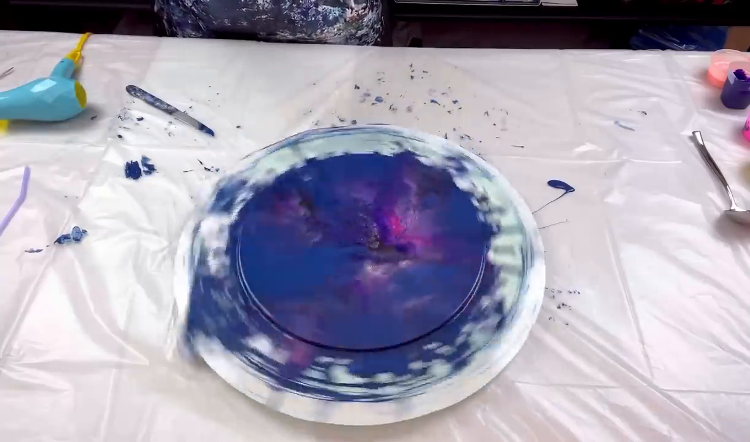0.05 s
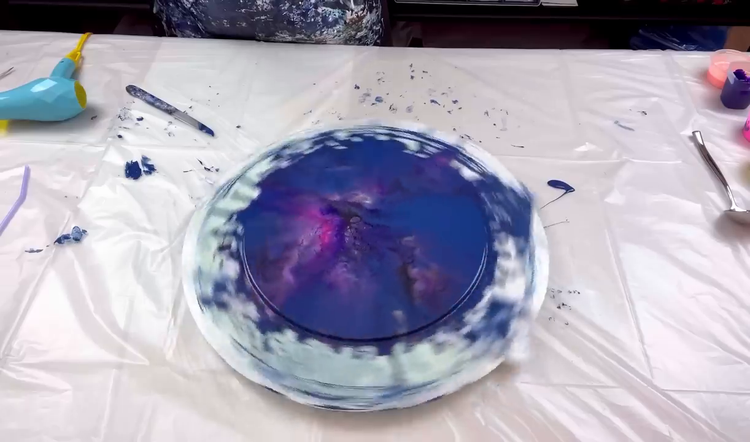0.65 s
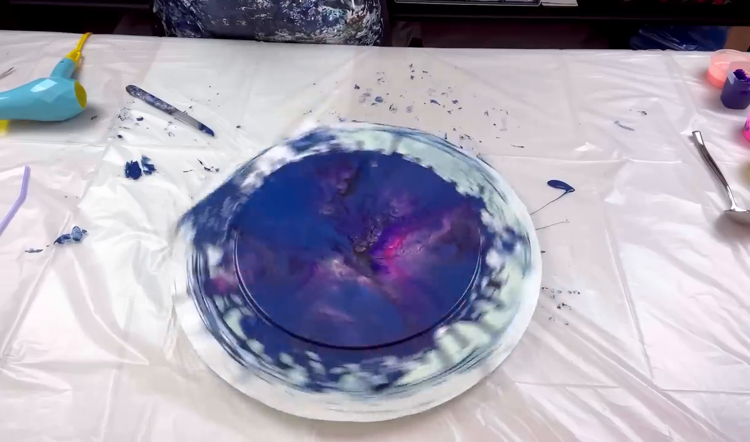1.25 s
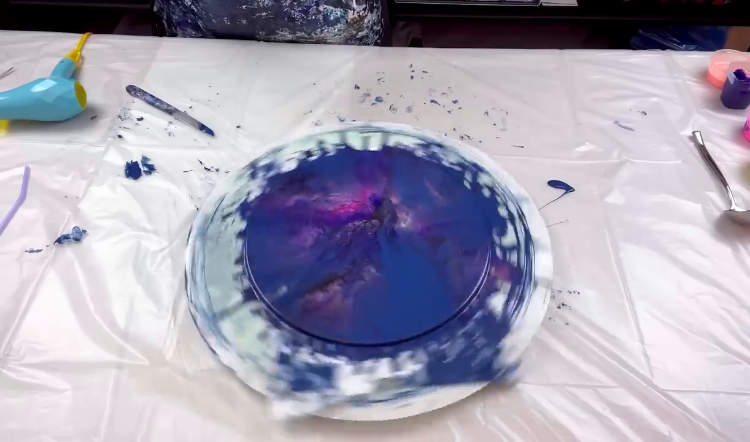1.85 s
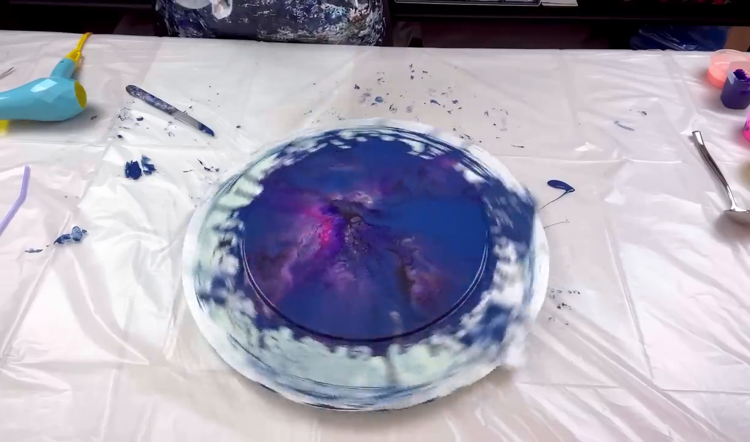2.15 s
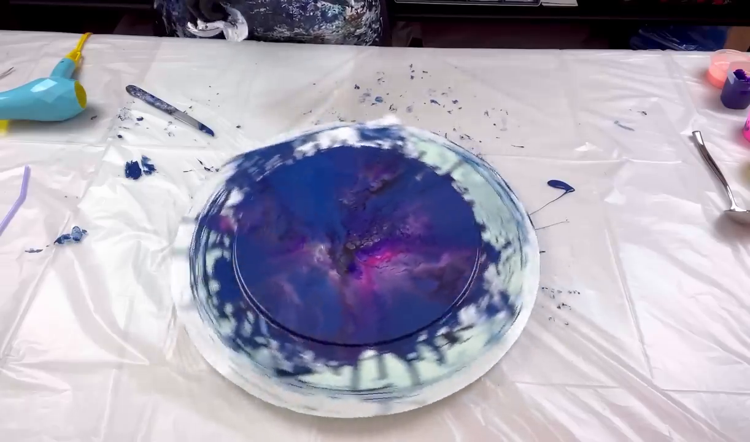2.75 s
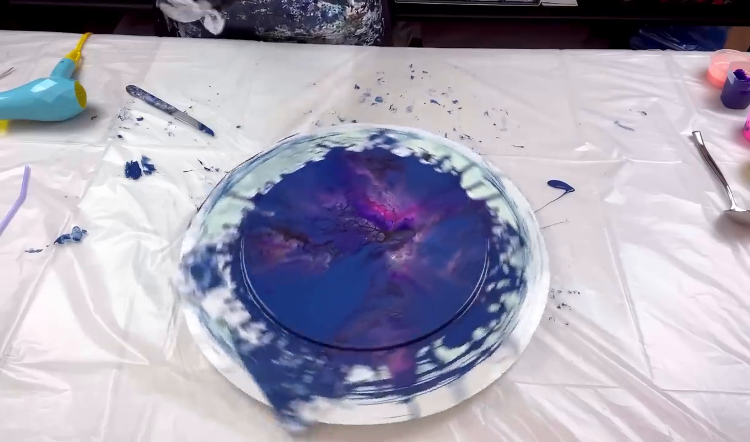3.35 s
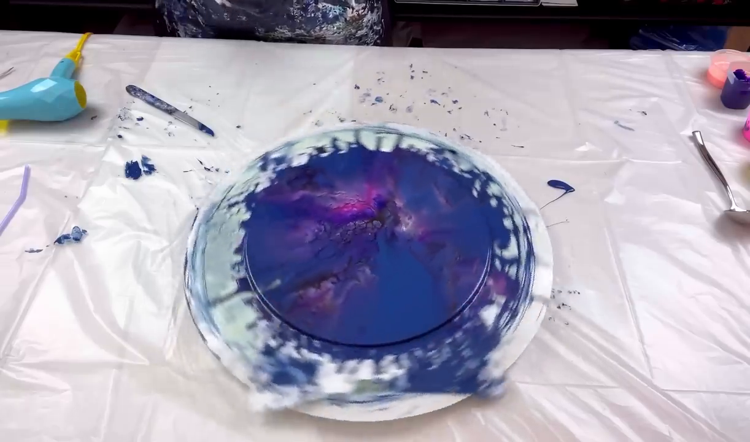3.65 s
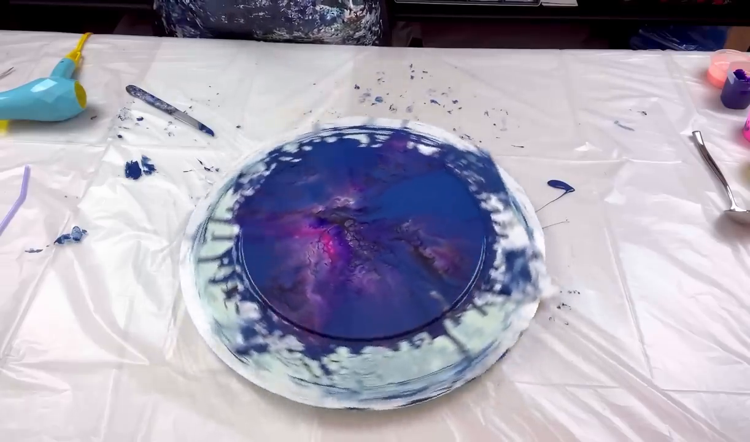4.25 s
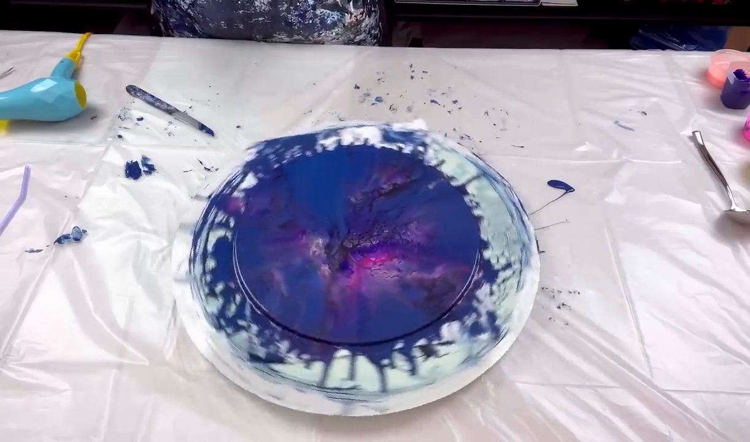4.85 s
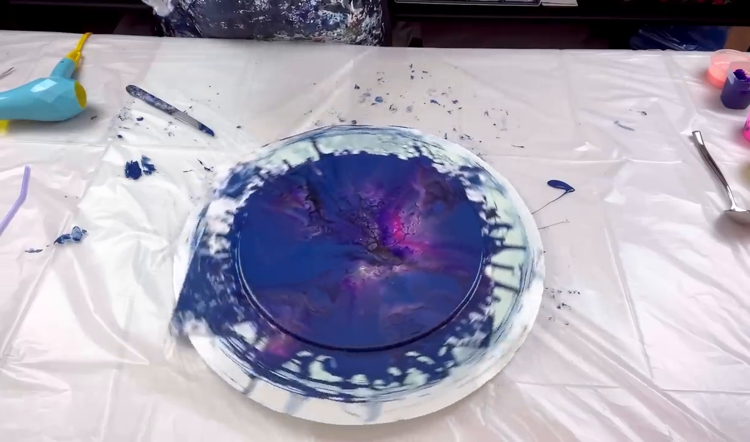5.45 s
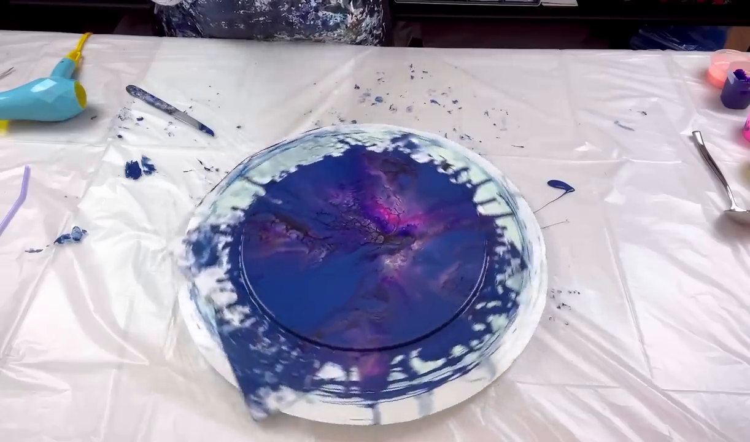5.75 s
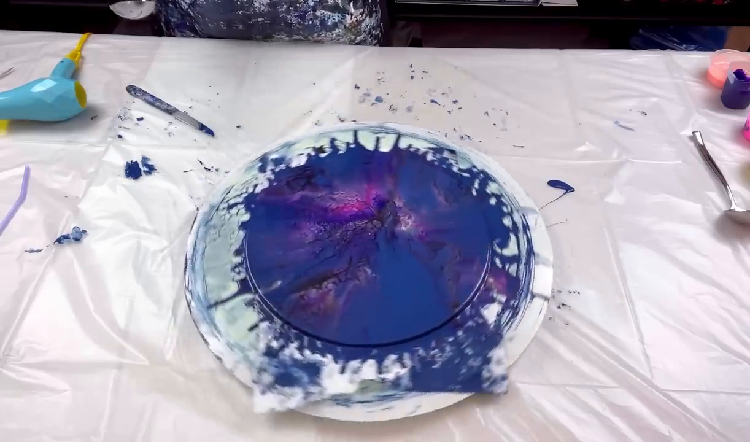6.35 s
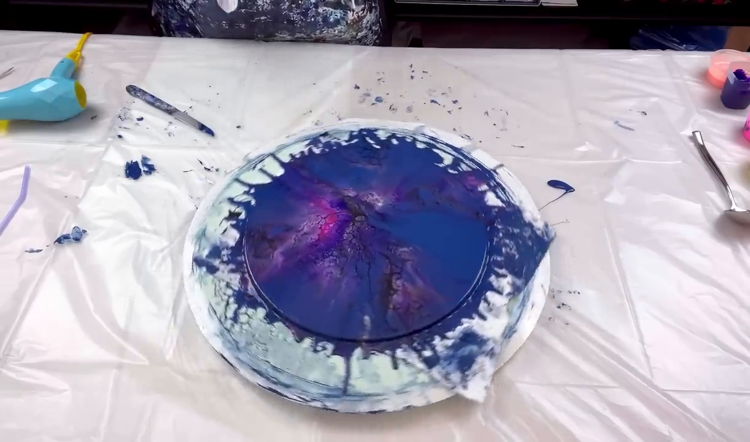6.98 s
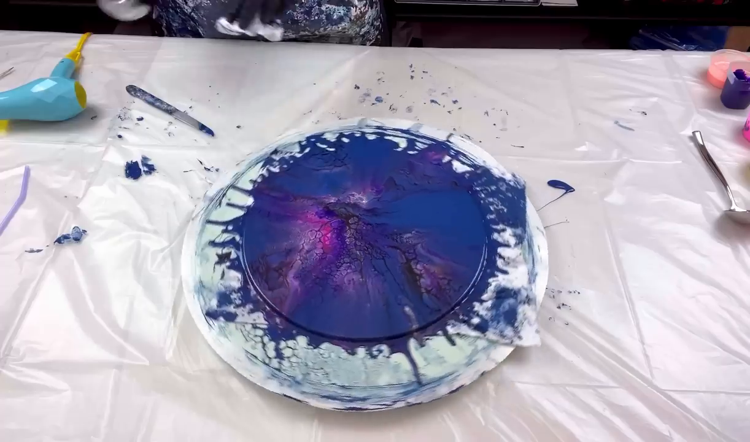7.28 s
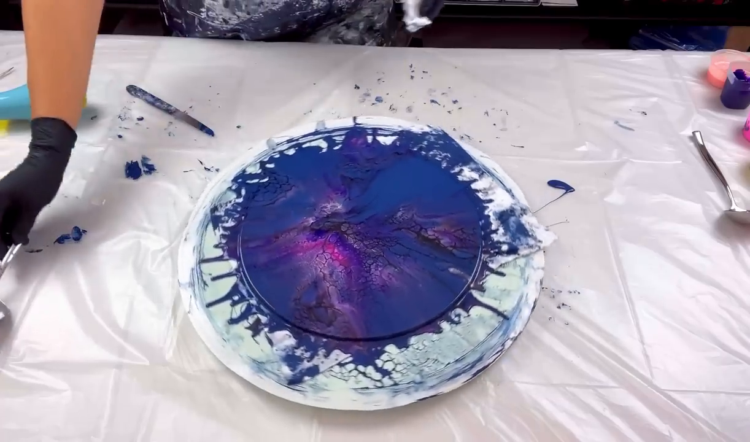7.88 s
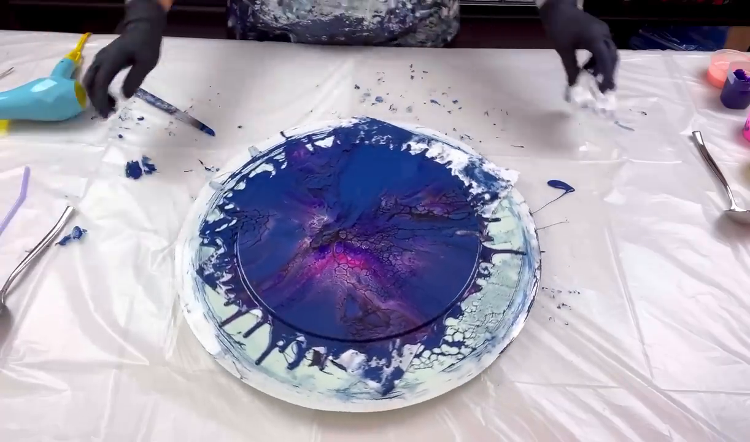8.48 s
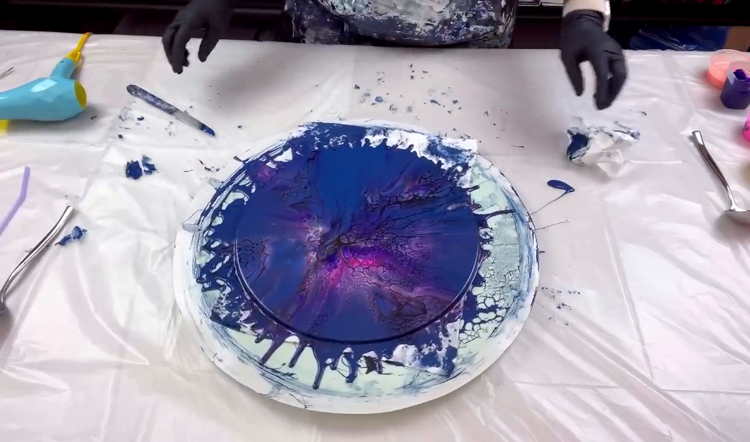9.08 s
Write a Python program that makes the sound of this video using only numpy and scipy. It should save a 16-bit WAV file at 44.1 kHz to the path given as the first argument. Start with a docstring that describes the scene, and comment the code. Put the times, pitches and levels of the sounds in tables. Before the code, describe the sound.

A spinning turntable coasts with a low rumble, a gritty rattle and a hiss from its ball bearing, growing gradually softer. Loose balls tick and clack, with faint squeaks and light plastic rustles. Near the end a metal tool scrapes over the plastic-covered table, drops with a loud knock, bounces and rings briefly. It is all heard close up in a small, quiet studio.

```python
"""A turntable's ball bearing rumbles, rattles and hisses through the platter, ever softer as it coasts
towards rest under a wet canvas. Loose balls clack, grit chatters, dry spots squeak; plastic rustles.
Near the end a metal tool is dragged over the plastic-covered table, bumps, drops with a loud knock,
bounces and rings. It is all heard close up, in a small studio that answers the knocks."""
import sys
import numpy as np
from scipy import signal
from scipy.fft import rfft, irfft, next_fast_len
from scipy.io import wavfile
from scipy.ndimage import uniform_filter1d, map_coordinates

SR = 44100
rng = np.random.default_rng(int(sys.argv[2]) if len(sys.argv) > 2 else 0)


def waveform_to_disk(signal):
    """Save audio, clipped to [-1, 1], as 16-bit WAV at the path in sys.argv[1]."""
    frames = np.transpose(np.atleast_2d(signal))
    scaled = np.clip(frames, -1, 1) * 32767
    samples = np.round(scaled).astype(np.int16)
    wavfile.write(sys.argv[1], SR, samples)


N = 402191

# Resonances of platter and table top. Each row: pitch in Hz, width in Hz, level in dB.
TABLE_MODES = [(54, 15, 2), (101, 12, -2), (131.6, 18, -2), (185.3, 20, 1), (226, 28, 2), (331, 18.5, 0),
               (374, 26, -4), (430, 32, 2.5), (530, 51, 2.5), (556, 28, 2.5), (656, 35, 7), (770, 24, -3),
               (882, 56, 9.5), (975, 49, 7.5), (1163, 77, 0), (1218, 46, 5), (1352, 240, 1.5),
               (1585, 70, 2.5), (1781, 32, 3), (2014, 44, -1.5)]
# Colour of the bearing's hiss and ticks. Each row: frequency in Hz, gain in dB.
HISS_COLOUR = [(800, -48.5), (2000, 3), (2700, 3), (3700, -3), (4500, -4), (5500, 0.5), (6800, 2),
               (8000, 2.5), (9500, -1.5), (12000, -1), (14500, -4.5), (16000, -31)]
# Swells of rattle, hiss and grit. Each row: time in seconds, gain in dB.
TREBLE_SWELLS = [(0.0, 1), (0.78, 0.5), (1.08, -3), (1.16, 2), (1.34, -.5), (1.42, 2), (1.7, 0.5),
                 (2.38, 1.5), (2.55, -1), (2.66, -3), (2.85, 0), (3.1, 0), (3.2, 2.5), (3.6, 0), (4.08, 0),
                 (4.2, 1.5), (4.28, -1), (4.39, 1.5), (4.53, 0), (4.58, -5), (4.66, -0.5), (5.0, -1.5),
                 (5.18, -2), (5.27, 2), (5.42, 1.5), (5.47, -.5), (5.64, 2.5), (5.75, -.5), (5.86, 4.5),
                 (5.9, -1), (5.96, 3.5), (6.04, 1), (6.12, 3), (6.16, .5), (6.25, 2), (6.68, -2.5),
                 (6.72, 3), (6.88, -1.5), (6.96, 3), (7.04, -5), (7.1, 4), (7.2, 4.5), (7.26, -1),
                 (7.48, -1), (7.54, 2.5), (7.7, 0), (8.56, 7), (8.88, -5), (9.1, -1.5)]
# Stereo images of the bearing and of the table's edge. Each row: frequency in Hz, left-right likeness.
BEARING_IMAGE = [(60, 0.91), (150, 0.97), (400, 0.7), (1200, 0.85), (2400, 0.13), (5400, 0.21),
                 (7500, 0.92), (12000, 1)]
EDGE_IMAGE = [(60, 1), (150, 1), (400, 0.4), (700, 0.6), (1300, 0.44), (2200, 0.3), (4500, -0.44),
              (7000, 0.75), (12000, 0.98)]
# The tool's blows. Each row: start in seconds, relative level in dB, click and thud offsets in dB.
TOOL_BLOWS = [(7.9155, -16, -11, -12), (7.920, -15, -30, -10), (7.926, -19.5, -26, 6),
              (7.955, -29, -31.5, 8), (7.9605, -31, -31.5, 10), (7.975, -36, -30, 3),
              (8.0714, -7.5, 2, -11), (8.0736, -8.5, -6, -10.5), (8.078, -20, -6, -6),
              (8.0856, -11.5, -11.5, -6), (8.093, -23, -7, -5), (8.101, -23, -6, -4), (8.112, -25, -8, -5),
              (8.1334, -10.5, -6.5, -5), (8.146, -26, -6, -4.5), (8.1703, -20, -1, 3.5)]


def amp(db):
    """Decibels to gain."""
    return 10 ** (np.asarray(db) / 20)


def unit(x):
    """x at rms 1."""
    return x / np.sqrt(np.mean(x ** 2) + 1e-20)


def along(points, hz):
    """Read (Hz, value) points on a log frequency axis."""
    f, v = np.transpose(points)
    return np.interp(np.log(hz + 1), np.log(f + 1), v)


def curve(points):
    """Join (seconds, value) points into one value per sample."""
    return np.interp(np.arange(N) / SR, *np.transpose(points))


def wobble(rate):
    """A smooth random curve, rate knots a second."""
    return map_coordinates(rng.standard_normal(int(N * rate / SR) + 4), [np.arange(N) * rate / SR])


def sine(hz):
    """A tone that follows a moving pitch."""
    return np.sin(2 * np.pi * np.cumsum(hz, axis=-1) / SR)


def stroke(start, attack, hold, release, db):
    """An envelope that rises to db, holds and lets go; times in seconds."""
    return amp(db) * np.interp(np.arange(N) / SR, start + np.cumsum([0, attack, hold, release]),
                               [0, 1, 1, 0])


def add(track, s, sound):
    """Mix a sound in at s seconds."""
    start = round(s * SR)
    track[:, start:start + sound.shape[-1]] += sound[..., :N - start]


def sized(x, db):
    """Give a hit the energy of one millisecond at db."""
    return x * amp(db) * np.sqrt(SR / 1000 / np.sum(np.mean(x ** 2, axis=0)))


def filtered(x, response):
    """x through a minimum-phase filter whose gain is response(Hz)."""
    size = 16384
    cepstrum = irfft(np.log(np.maximum(response(np.fft.rfftfreq(size, 1 / SR)), 1e-6)))
    cepstrum[..., 1:size // 2] *= 2
    cepstrum[..., size // 2 + 1:] = 0
    kernel = irfft(np.exp(rfft(cepstrum)))
    return signal.fftconvolve(np.atleast_2d(x), np.atleast_2d(kernel), axes=1)[:, :x.shape[-1]]


def equalised(x, colour):
    """x shaped by a curve of (Hz, dB) points."""
    return filtered(x, lambda hz: amp(along(colour, hz)))


def peaks(modes, hz, base_db):
    """Gain of (Hz, width, dB) resonances standing on a flat base."""
    power = sum(amp(db) ** 2 * (hz * width) ** 2 / ((centre ** 2 - hz ** 2) ** 2 + (hz * width) ** 2)
                for centre, width, db in modes)
    return np.sqrt(power + amp(base_db) ** 2)


def through_table(x, colour, damping=1):
    """A force of the given colour shakes the table top; damping widens its resonances."""
    modes = np.array(TABLE_MODES) * [1, damping, 1]
    return filtered(x, lambda hz: amp(along(colour, hz)) * peaks(modes, hz, base_db=-11))


def spread(pair, image=BEARING_IMAGE):
    """Two unrelated signals become left and right, as alike at each frequency as the image says."""
    size = next_fast_len(pair.shape[1] + 2048)
    likeness = np.clip(along(image, np.fft.rfftfreq(size, 1 / SR)), -.98, .98)
    turn = np.arccos(likeness) / 2
    mid, side = irfft(rfft(pair, size) * [np.cos(turn), np.sin(turn)], size)[:, :pair.shape[1]]
    return np.array([mid + side, mid - side])


def contacts(rate, scatter_db, smooth):
    """Stereo stream of tiny impacts, rate a second, on a bed of smooth friction."""
    hits = (rng.random((2, N)) < rate / SR) * rng.choice([-1, 1], (2, N))
    strength = amp(scatter_db * rng.standard_normal((2, N)))
    return spread(unit(hits * strength) + smooth * rng.standard_normal((2, N)))


def burst(t60, scatter, image=BEARING_IMAGE):
    """One contact: a sharp push, then a quickly dying scatter of near reflections."""
    t = np.arange(SR // 3) / SR
    tail = spread(rng.standard_normal((2, len(t))), image) * amp(-60 * t / t60)
    return (t == 0) + scatter * tail / np.linalg.norm(tail[0])


def speed():
    """Speed of the platter, 1 at the start: dry friction and viscous drag slow it down."""
    stop_s, viscous_time_s = 9.66, 16
    left_s = np.maximum(stop_s - np.arange(N) / SR, .1)
    return np.expm1(left_s / viscous_time_s) / np.expm1(stop_s / viscous_time_s)


def coasting_db(full_db, loss_db):
    """A level that is full_db at full speed and loss_db lower at a tenth of it."""
    return full_db + loss_db * np.log10(speed())


def shifting(x, patchy_db):
    """The colour changes in short random patches as the balls move round."""
    bands = signal.stft(x, nperseg=512)[2]
    patches = uniform_filter1d(rng.standard_normal(bands.shape[1:]), size=3, axis=0)
    patches = uniform_filter1d(patches, size=11, axis=1)
    return signal.istft(bands * amp(patchy_db * unit(patches)), nperseg=512)[1][:, :N]


def bearing():
    """Balls roll over the roughness of their track; slower means fewer and softer impacts."""
    # Colours of the rolling forces. Each row: frequency in Hz, gain in dB.
    rumble_colour = [(40, -40.5), (90, -13.5), (130, -5.5), (220, 0.5), (420, -3), (600, -14),
                     (1200, -52.5)]
    drone_colour = [(250, -40.5), (450, -5), (620, -3.5), (780, -3), (920, -1), (1050, 0.5), (1300, -21.5),
                    (2500, -50)]
    rattle_colour = [(500, -37), (900, -15.5), (1150, -4.5), (1500, -3.5), (2200, 1.5), (3000, -2.5),
                     (4500, -3.5), (8000, -15.5), (16000, -42.5)]
    # Swells on top of the slow fade. Each row: time in seconds, gain in dB.
    rumble_swells = [(0.0, -0.5), (0.98, -1.5), (1.06, 5.5), (1.16, -3.5), (1.56, 0.5), (1.64, -6.5),
                     (1.8, 5.0), (1.98, 0), (3.0, 2.0), (3.42, -2), (3.56, 4.5), (3.92, -3.5), (4.04, 2.5),
                     (4.2, 0), (4.62, -2.0), (4.76, 7), (5.08, -1.5), (5.4, 4), (6.02, -3.5), (6.24, 6.5),
                     (6.38, -1.0), (7.34, 0.5), (7.68, -5.5), (8.6, 10), (9.12, -2)]
    drone_swells = [(0.0, 1), (1.74, -1), (1.88, 1), (2.52, -1.5), (2.62, 3.5), (2.7, -3.0), (3.22, 0.5),
                    (3.36, -4.5), (4.48, 1), (4.6, -5), (4.9, 2), (5.04, -1.5), (5.6, -1), (5.78, -12),
                    (5.86, -3), (5.9, -9), (6.0, -1), (6.48, -3.5), (6.72, 3.0), (7.48, 1), (7.54, 7),
                    (7.68, 1.5), (8.42, 15.5), (8.6, 1.5), (9.12, 4)]
    pace, flutter_db = speed(), wobble(45)
    treble_db = curve(TREBLE_SWELLS) + .6 * wobble(16) + flutter_db
    rumble = unit(through_table(contacts(900 * pace, scatter_db=0.5, smooth=1.0), rumble_colour))
    drone = unit(through_table(contacts(600 * pace, scatter_db=1.5, smooth=0.76), drone_colour))
    rattle = through_table(contacts(500 * pace, scatter_db=0.0, smooth=1.0), rattle_colour)
    rattle = unit(shifting(rattle, patchy_db=2.6))
    hiss = equalised(contacts(1300 * pace, scatter_db=4.0, smooth=1.51), HISS_COLOUR)
    hiss = unit(shifting(hiss, patchy_db=2.5))
    return (rumble * amp(coasting_db(-51, 19) + curve(rumble_swells) + 1.1 * wobble(25))
            + drone * amp(coasting_db(-47, 19) + curve(drone_swells) + flutter_db)
            + rattle * amp(coasting_db(-50, 15.5) + treble_db)
            + hiss * amp(coasting_db(-49.5, 10.3) + treble_db + 0.84 * wobble(30)))


def grit():
    """Specks in the track make the balls chatter: tiny dry pings of random pitch, in uneven clumps."""
    low_hz, high_hz = 1150, 6200
    clump_db, range_db, ring_cycles = 4.5, 7, 24
    strongest_db = coasting_db(-42.5, 12) + curve(TREBLE_SWELLS)
    pings_per_s = 300 * np.sqrt(speed()) * amp(clump_db * wobble(18))
    starts = np.flatnonzero(rng.random(N) < pings_per_s / SR)
    t, out = np.arange(SR // 50) / SR, np.zeros((2, N))
    for i, (pitch, softness, left, right) in zip(starts, rng.random((len(starts), 4))):
        hz = low_hz * (high_hz / low_hz) ** pitch
        phase = np.pi * np.array([[left], [right]])
        ping = np.sin(2 * np.pi * hz * t + phase) * amp(-60 * t * hz / ring_cycles)
        add(out, i / SR, amp(strongest_db[i] - range_db * softness) * ping)
    return out


def whir():
    """The balls' wavering tone falls with the speed and swells at each resonance of the platter."""
    hz = 2735 * speed()
    tone = sine(hz * (1 + 0.024 * wobble(130)))
    return tone * peaks(TABLE_MODES, hz, base_db=-7) * amp(coasting_db(-65.5, 11.8) + 4.1 * wobble(20))


def boom():
    """The heavy platter shakes the table's lowest modes unevenly as it turns."""
    # Colour of the shaking. Each row: frequency in Hz, gain in dB.
    boom_colour = [(20, -34.5), (35, -5), (55, -2), (100, 1), (130, -6), (220, -26), (500, -57)]
    # Its swells. Each row: time in seconds, gain in dB.
    boom_swells = [(0, 0), (.2, -3), (.45, 0), (.9, -1), (1.15, 3), (1.3, -1), (1.85, 1), (2.0, -4),
                   (2.25, -4), (2.35, -1), (3.3, 3), (3.55, 3), (3.72, -1), (4.0, 2), (4.45, 1), (4.55, -6),
                   (4.75, 1), (5.08, 2.5), (5.14, -3), (5.3, 2), (5.75, 2), (5.85, -4), (6.2, 1),
                   (6.38, -3), (6.46, 4), (6.56, -2), (6.75, 0), (7.2, 0), (7.6, -3), (9.12, -3)]
    gain = amp(coasting_db(-57, 10.4) + curve(boom_swells) + 1.8 * wobble(9))
    return gain * unit(through_table(contacts(280, scatter_db=0.5, smooth=0.93), boom_colour))


def air():
    """The studio's quiet, steady room tone."""
    # Its colour. Each row: frequency in Hz, gain in dB.
    air_colour = [(15, -50), (25, -12), (75, -4), (150, -9), (488, -8), (856, -5.5), (1120, -10),
                  (2070, -8), (2500, -19.5), (6720, -22), (8320, -21), (10000, -21.5), (12100, -34),
                  (15000, -15.5)]
    return amp(-66.5) * unit(equalised(spread(rng.standard_normal((2, N))), air_colour))


def clacks():
    """Loose balls catch up and tick together, knocking the platter; fewer and softer as it slows."""
    # The loudest collisions. Each row: start in seconds, relative knock and tick levels in dB.
    loud_clacks = [(.1197, -46, -35), (.2913, -40, -36.5), (.716, -32, -42), (.892, -34, -41),
                   (.972, -42, -40), (1.134, -42, -40), (1.1445, -36, -36), (1.194, -33, -40),
                   (1.383, -35, -36.5), (1.495, -36, -40), (1.5305, -36, -40.5), (1.724, -41, -40),
                   (1.900, -28, -44), (2.1834, -35, -38.5), (2.27, -31, -48.5), (2.302, -39, -40),
                   (2.41, -41, -42), (2.6, -31, -40.5), (2.7155, -42, -39), (2.818, -39, -38),
                   (2.9355, -46, -40), (2.976, -42, -39), (3.022, -35, -39), (3.028, -33, -41),
                   (3.1915, -32, -34.5), (3.2648, -28.5, -40.5), (3.988, -50, -42), (4.0245, -29.5, -46),
                   (4.037, -35, -41), (4.332, -46, -43), (4.384, -43, -41), (4.7666, -44, -43.5),
                   (4.869, -40, -38.5), (4.903, -37, -39), (5.1415, -46, -46), (5.157, -48, -43),
                   (5.312, -39, -39), (5.572, -37, -44), (5.701, -38.5, -43), (5.856, -39, -46),
                   (6.085, -39, -52), (6.113, -42, -44), (6.444, -41.5, -52), (6.581, -40, -48),
                   (6.739, -32, -39.5), (6.946, -38, -50), (7.303, -42, -48), (7.5294, -39, -53),
                   (7.731, -37, -62)]
    # Colour of the knock. Each row: frequency in Hz, gain in dB.
    knock_colour = [(100, -15), (400, -0.5), (900, 0.5), (2000, -0.5), (4000, 6), (9000, -16)]
    pace = speed()
    faint_per_s = 4 * pace
    starts = np.flatnonzero(rng.random(N) < faint_per_s / SR)
    faint_db = -46 + 1.5 * rng.standard_normal((len(starts), 2)) + 10 * np.log10(pace[starts, None])
    faint_clacks = np.column_stack([starts / SR, faint_db])
    knock, tick = np.zeros((2, 2, N))
    for s, knock_db, tick_db in np.vstack([loud_clacks, faint_clacks]):
        add(knock, s, amp(knock_db) * burst(t60=0.11, scatter=2.0))
        add(tick, s, amp(tick_db) * burst(t60=.016, scatter=2.6))
    return amp(15) * through_table(knock, knock_colour) + amp(11) * equalised(tick, HISS_COLOUR)


def squeaks():
    """A dry spot in the bearing sings for a moment: a narrow, unsteady tone that swells and fades."""
    # Each row: start and length in seconds, pitch and its rise in Hz, relative level in dB.
    dry_spots = [(0.262, 0.053, 2400, 0, -45), (0.38, .06, 5900, 0, -55), (3.315, 0.07, 1300, 0, -51),
                 (3.877, 0.063, 2690, 100, -55), (5.05, 0.13, 2000, 0, -58), (5.205, .09, 1650, 100, -54),
                 (5.3, .13, 2100, 50, -58), (5.59, .1, 2550, 150, -59), (5.92, .1, 2700, 100, -58),
                 (6.18, .13, 2800, 0, -61), (6.77, 0.22, 3450, 285, -64), (7.079, 0.19, 2580, 104, -59)]
    out = np.zeros((2, N))
    waver = np.array([wobble(400), wobble(400)])
    for s, length, hz, rise_hz, db in dry_spots:
        progress = np.linspace(0, 1, round(length * SR))
        pitch = (hz + rise_hz * progress) * (1 + 0.0504 * waver[:, round(s * SR):][:, :len(progress)])
        add(out, s, amp(db + 3.5) * np.sin(np.pi * progress) * sine(pitch))
    return out


def rustle():
    """Thin plastic and paper brush under the hands with a soft, very high hiss."""
    # Each row: start, attack, hold and release in seconds, level in dB.
    brushes = [(1.54, .05, .06, .08, -49), (3.31, .02, .05, .2, -50), (7.86, .04, .04, .12, -50),
               (8.02, .04, .09, .1, -51)]
    # Their colour. Each row: frequency in Hz, gain in dB.
    brush_colour = [(2000, -30), (5500, -12), (8000, -10), (10000, -2), (12000, 0), (14500, -7)]
    friction = unit(equalised(contacts(3000, scatter_db=3, smooth=1.0), brush_colour))
    return sum(stroke(*row) for row in brushes) * friction * amp(1.2 * wobble(60))


def chime():
    """Rubbed by the bearing, the platter's strongest mode rings briefly as a clear, wandering tone."""
    # Each row: start, attack, hold and release in seconds, level in dB, pitch in Hz.
    rubs = [(5.42, .02, .04, .03, -58, 895), (5.59, .02, .07, .025, -57, 900),
            (5.833, .015, .015, .015, -51, 862), (5.95, .012, .008, .012, -55, 880),
            (5.992, .012, .018, .012, -48.5, 905), (6.055, .012, .012, .012, -53, 890),
            (6.112, .012, .008, .012, -53, 900), (6.15, .015, .03, .015, -53.5, 885),
            (6.215, .015, .035, .015, -54, 875)]
    drift = 1 + .025 * wobble(70)
    tone = sum(stroke(*envelope) * sine(hz * drift) for *envelope, hz in rubs)
    return tone * amp(2.5 * wobble(55))


def tool_slide():
    """The tool's tip scrapes and judders over the plastic sheet; once it tips over, its shaft sings."""
    # Resonances of tip and shaft. Each row: pitch in Hz, width in Hz, level in dB.
    tip_modes = [(646, 150, -5), (1070, 130, 1.5), (1275, 90, -6), (2100, 200, -8), (2770, 120, 1.5),
                 (3600, 160, -6), (4170, 160, -2), (4810, 150, -15), (5520, 90, -8), (6750, 180, -9.5),
                 (7900, 630, -23.5), (12470, 800, -15)]
    shaft_modes = [(950, 200, -17), (2072, 90, 7), (2150, 70, 0), (2670, 90, -1), (2830, 90, 0.5),
                   (4080, 200, -10), (4700, 400, -18), (11800, 2500, -33)]
    # The tip's main resonance sinks as it tilts.
    # Each row: time in seconds, pitch and width in Hz, relative level in dB.
    tip_glide = [(7.785, 1740, 420, -3), (7.845, 1520, 380, -2), (7.895, 1430, 380, -3)]
    # The shaft's singing as it slides to rest. Each row: time in seconds, level in dB.
    shaft_levels = [(7.91, -90), (7.94, -49), (7.995, -51), (8.04, -38.5), (8.22, -42), (8.33, -46.5),
                    (8.46, -55.5), (8.53, -72.5), (8.9, -63.5), (9.05, -90.5)]
    t = np.arange(N) / SR
    crossfade_s, judder_start_s = .045, 7.826
    scrape = contacts(2500, scatter_db=2, smooth=0.9)
    tip = unit(filtered(scrape, lambda hz: peaks(tip_modes, hz, base_db=-47)))
    for s, hz, width_hz, db in tip_glide:
        fade = np.exp(-((t - s) / crossfade_s) ** 2)
        resonance = unit(filtered(scrape, lambda f: peaks([(hz, width_hz, 0)], f, base_db=-60) ** 2))
        tip += amp(db) * fade * resonance
    rub = contacts(900, scatter_db=0, smooth=0.8)
    shaft = unit(filtered(rub, lambda hz: peaks(shaft_modes, hz, base_db=-27)))
    judder_hz = 180 - 120 * (t - judder_start_s)  # pressed harder, the tip sticks and slips
    judder = sine(judder_hz * (1 + 0.025 * wobble(81)))
    return (stroke(start=7.738, attack=.085, hold=.07, release=.075, db=-36.8) * tip
            + stroke(judder_start_s, attack=.015, hold=.045, release=.02, db=-46) * judder
            + amp(curve(shaft_levels)) * shaft)


def tool_knocks():
    """Each blow raps and thumps the table, bare metal contact adds a click, and the room answers."""
    # Colours of a blow's three parts. Each row: frequency in Hz, gain in dB.
    rap_colour = [(30, -29), (100, -8.5), (300, -8.5), (600, 2), (900, 3.5), (1230, 5), (1550, -1.5),
                  (1900, 3.5), (2600, 1.5), (4000, -20.5), (7000, -27.5), (15000, -56.5)]
    thud_colour = [(25, -26.5), (60, -8.5), (115, 2.5), (220, -3), (420, 0.5), (900, -23), (4000, -67.5)]
    click_colour = [(500, -4.5), (1500, 2), (2600, 4), (3800, 2), (6000, -1.5), (7500, -8), (11000, -23.5),
                    (15000, -39.5)]
    out = np.zeros((2, N))
    for s, db, click_db, thud_db in TOOL_BLOWS:
        rap = through_table(burst(t60=0.035, scatter=2.56, image=EDGE_IMAGE), rap_colour, damping=1.34)
        thud = through_table(burst(t60=0.043, scatter=0.11, image=EDGE_IMAGE), thud_colour)
        click = equalised(burst(t60=0.009, scatter=2.6, image=EDGE_IMAGE), click_colour)
        blow = sized(rap, db + 4) + sized(thud, db + thud_db) + sized(click, db + click_db - 8.5)
        add(out, s, blow)
        add(out, s, amp(-5) * studio(blow))
    return out


def studio(x):
    """The small room's reverb: each frequency dies at its own speed."""
    # Each row: frequency in Hz, seconds to fall by 60 dB.
    decay_times = [(100, 0.25), (500, 0.27), (1500, 0.25), (5000, 0.16), (14000, 0.11)]
    noise = spread(rng.standard_normal((2, SR * 3 // 4)), EDGE_IMAGE)
    hz, t, bands = signal.stft(noise, SR, nperseg=256)
    decay = amp(-60 * t / along(decay_times, hz)[:, None])
    build_up = 1 - np.exp(-t / 0.003)
    tail = signal.istft(bands * decay * build_up, SR, nperseg=256)[1]
    return signal.fftconvolve(x.mean(axis=0)[None], tail / np.linalg.norm(tail[0]), axes=1)


def tool_ring():
    """Every click feeds the steel tool's modes, which die away and waver as it rocks on the sheet."""
    # Each row: pitch in Hz, relative level in dB, seconds to fall by 60 dB.
    steel_modes = [(1947, -1, .62), (2061, -6.5, .8), (2977, -3, .38), (3484, -4, .58), (4839, -7, .58),
                   (5911, -15.5, 1.0), (6352, -10, .6), (6820, -11.5, .38), (8473, -10, .55)]
    limit_db = -12  # a harder click presses the tool into the sheet and rings it no louder
    t, out = np.arange(N) / SR, np.zeros((2, N))
    struck = t >= TOOL_BLOWS[0][0]
    t = t[struck]
    knots = np.linspace(t[0], t[-1], 50)
    for hz, mode_db, t60 in steel_modes:
        energy = sum((t >= s) * amp(min(db + click_db, limit_db) - 60 * np.abs(t - s) / t60) ** 2
                     for s, db, click_db, _ in TOOL_BLOWS)
        swell, turn = (np.interp(t, knots, rng.standard_normal(len(knots))) for _ in range(2))
        rocking = amp(3 * swell) * np.sin(2 * np.pi * (hz * t + .13 * turn + .3 * rng.random((2, 1))))
        out[:, struck] += amp(mode_db) * np.sqrt(energy) * rocking
    return amp(-25) * out


def scene():
    """Everything on the table sits a little to the right, over the room tone."""
    # The table's stereo balance. Each row: frequency in Hz, left minus right in dB.
    balance = [(60, -1), (200, -2), (1300, -2.5), (2400, -2), (4400, -6), (8000, -1.5), (13000, 0.8)]
    table = (tool_knocks() + tool_ring() + tool_slide() + rustle()
             + bearing() + grit() + whir() + boom() + squeaks() + chime() + clacks())
    return filtered(table, lambda hz: amp(np.outer([.5, -.5], along(balance, hz)))) + air()


def record(dry):
    """The microphone dips the treble, shifts left against right and cuts the top; the loudest peaks are rounded
    off softly."""
    # Phase between its two ports. Each row: frequency in Hz, lead of the left in radians.
    port_phase = [(100, -0.03), (500, -0.2), (1460, -0.1), (4390, 1.26), (5430, 0.54), (6980, 3),
                  (8610, 3.5), (11100, 5), (12300, 4), (14600, 10), (15300, 9.5)]
    notch_hz, width_hz, depth_db, top_hz = 8050, 700, 7, 14550
    notched = filtered(dry, lambda hz: amp(-depth_db / (1 + ((hz - notch_hz) / width_hz) ** 2)))
    rounded = notched / (1 + (notched / .92) ** 6) ** (1 / 6)
    size = next_fast_len(N + 8192)
    hz = np.fft.rfftfreq(size, 1 / SR)
    ports = np.exp(1j * np.outer([.5, -.5], along(port_phase, hz)))
    return irfft(rfft(rounded, size) * ports * (hz < top_hz), size)[:, :N]


dry = scene()
out = record(dry)
waveform_to_disk(out)
```